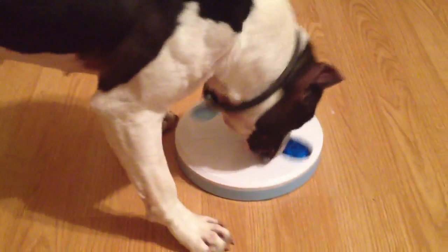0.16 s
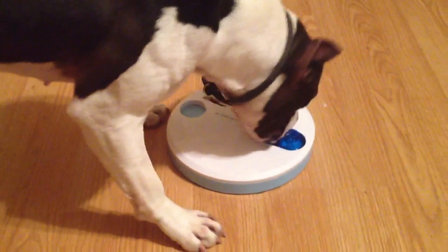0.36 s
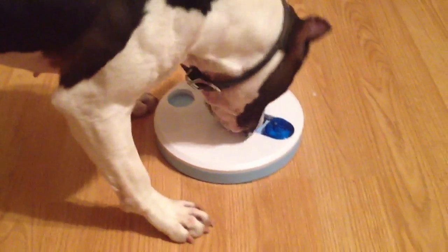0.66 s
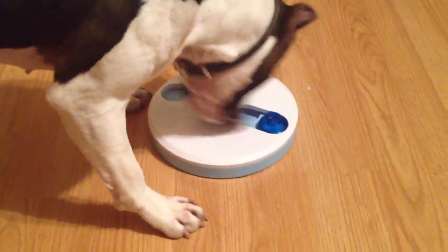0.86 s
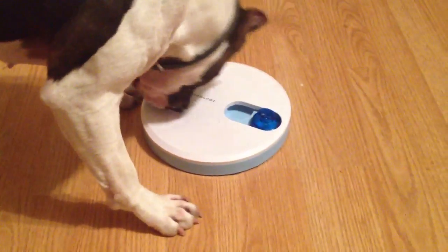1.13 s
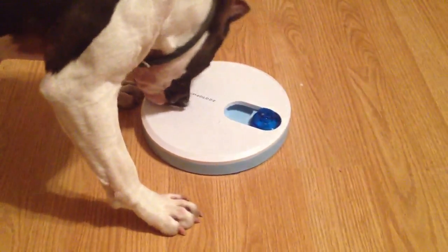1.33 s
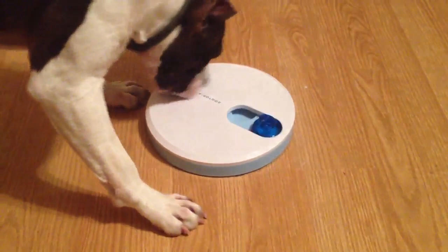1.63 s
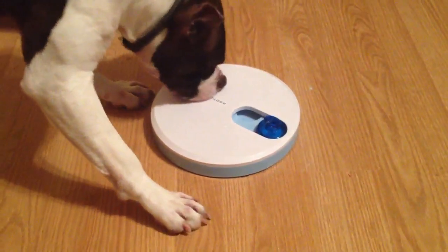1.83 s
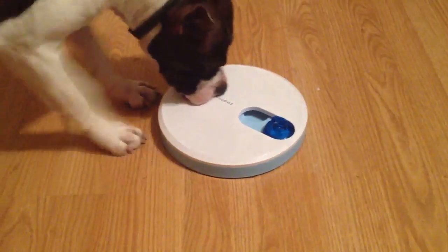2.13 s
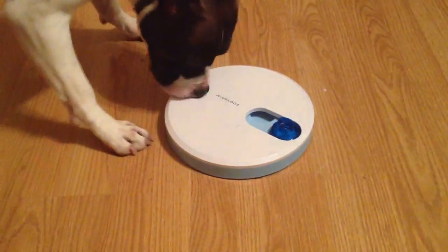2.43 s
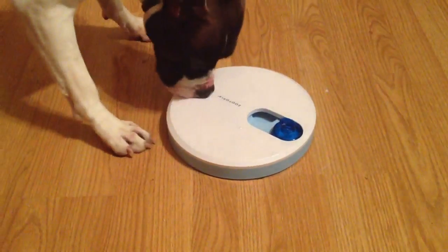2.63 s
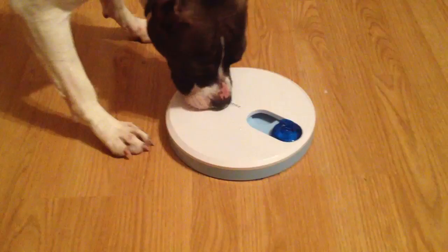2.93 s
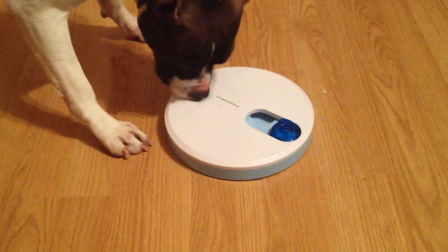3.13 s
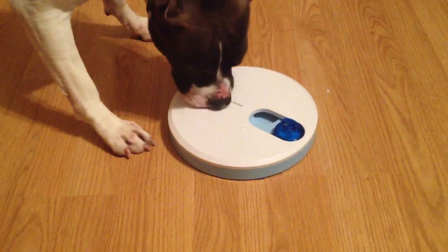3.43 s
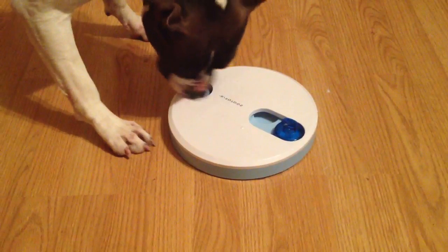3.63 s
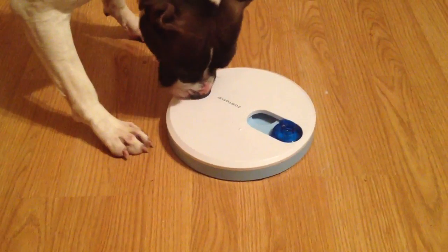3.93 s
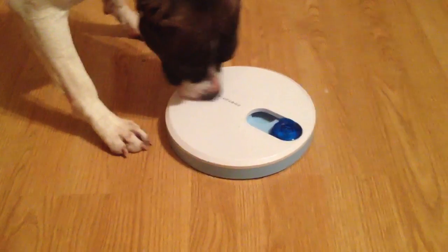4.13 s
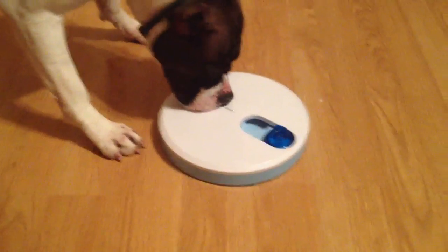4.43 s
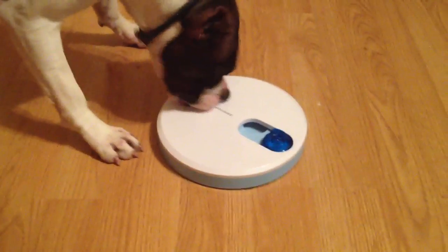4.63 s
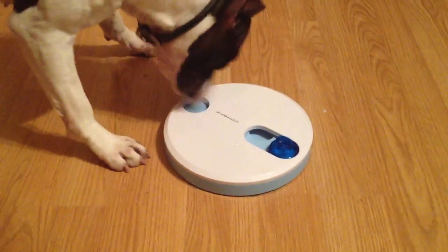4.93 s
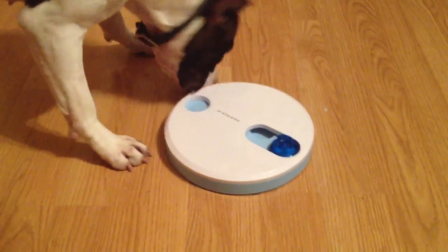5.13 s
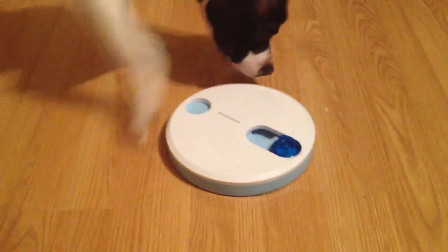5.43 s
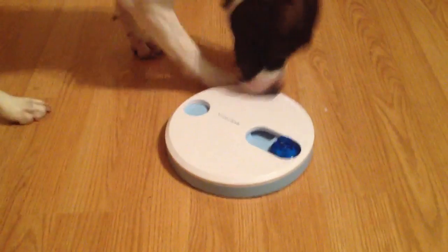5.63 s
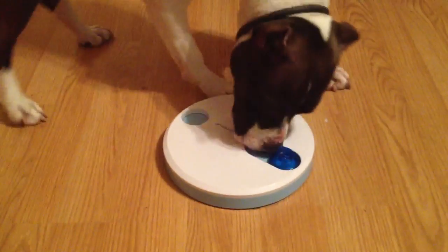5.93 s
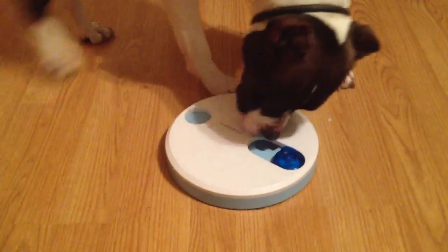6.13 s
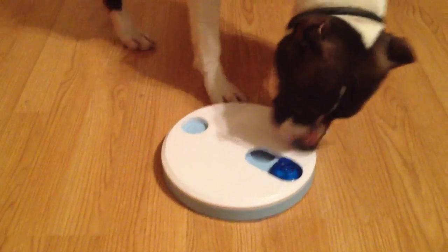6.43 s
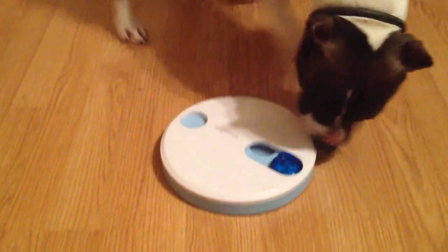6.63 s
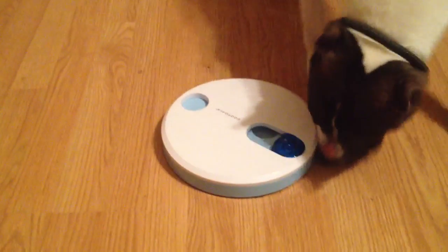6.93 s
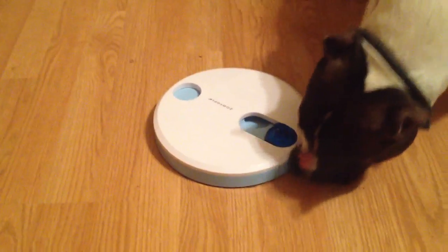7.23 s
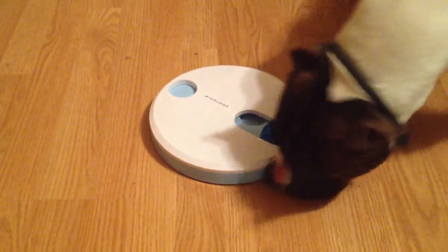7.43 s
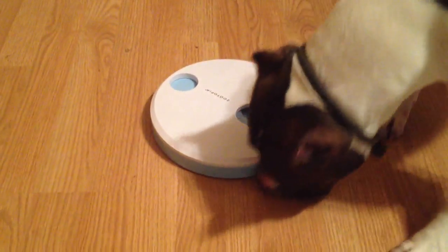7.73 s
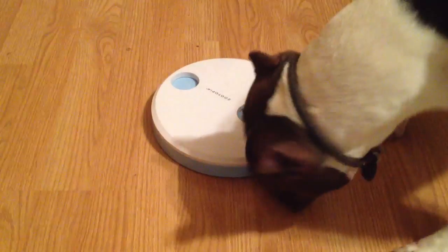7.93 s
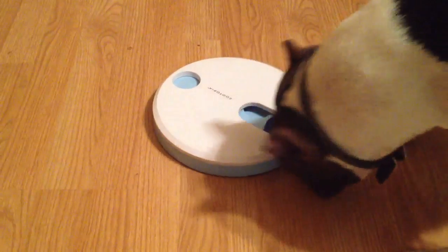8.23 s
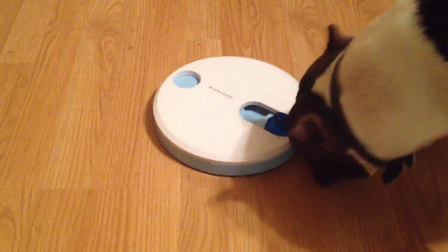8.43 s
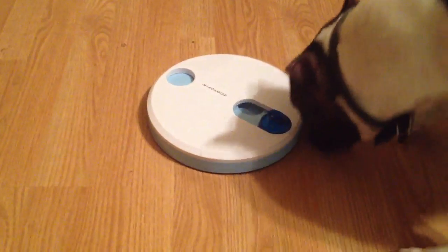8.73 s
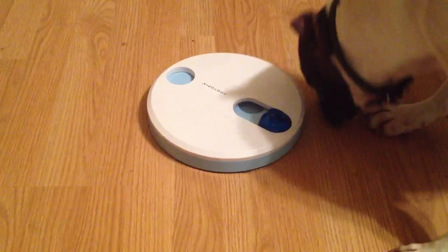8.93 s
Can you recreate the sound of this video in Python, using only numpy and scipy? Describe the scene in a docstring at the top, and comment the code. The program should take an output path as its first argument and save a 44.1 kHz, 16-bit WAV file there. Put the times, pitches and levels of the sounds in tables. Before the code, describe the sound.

A dog nudges a hollow plastic puzzle toy on a wooden floor in a small, live room. Soft bumps and lid rubbing run throughout, with sharp claw ticks just after two seconds, a short high whine near four, then a cluster of loud clacks. Later come claw clicks, soft paw thuds, breathy snuffles and a hard plastic judder near the end. One nearby microphone, faint air noise.

```python
"""A hollow plastic treat puzzle is worked by a dog on a wooden floor: bumps ring shell and lid as damped resonators,
and the turning lid rubs and judders as filtered random slips.
Claws tick (noise bursts and high modes), pads thud (swelling low cycles), nose and fur scuff (grainy hiss),
lips smack and the dog whines once (gliding harmonics). A small, bare room adds echoes and a tail;
one dry tick sounds on the microphone housing, over faint steady air noise."""
import sys
import numpy as np
from scipy import signal
from scipy.fft import rfft, irfft, next_fast_len
from scipy.io import wavfile

SR = 44100
rng = np.random.default_rng(int(sys.argv[2]) if len(sys.argv) > 2 else 0)


def inscribe(sig):
    """Save sig as 16-bit PCM at rate SR to the path in sys.argv[1].

    A 1-D sig is mono; a 2-D sig holds one channel per row.
    Samples are clipped to [-1, 1] before scaling.
    """
    pcm = np.round(np.clip(np.atleast_2d(sig).T, -1, 1) * 32767)
    wavfile.write(sys.argv[1], SR, pcm.astype(np.int16))


N = 399987
TIME = np.arange(N) / SR

# resonances of the hollow toy: centre_hz, width_hz, gain_db
SHELL = [(117, 34, -2), (174.5, 35, 2.5), (243, 62, 2.5), (300, 34, 1), (380, 11, -1), (477, 72, 1.5),
         (643, 114, -1), (750, 65, -0.5)]
# resonances of its lid: centre_hz, width_hz, gain_db
LID = [(844, 136, -1.5), (945, 32, 5), (1122, 220, 0), (1478, 160, 3), (1560, 314, 2), (2112, 450, 3),
       (2370, 514, 1.5)]
RASP = (520, 4.8, .3)  # coarse grain: slips per s, size spread dB, share of smooth hiss
SPOT_DETUNE = .035  # relative spread of resonances from spot to spot


def undb(db):
    """Decibels to gain."""
    return 10 ** (np.asarray(db) / 20)


def unit(x):
    """Scale to rms 1."""
    return x / np.sqrt(np.mean(x ** 2) + 1e-20)


def burst(x):
    """Scale each short sound to the energy of 10 ms at rms 1."""
    energy = np.sum(x ** 2, axis=-1, keepdims=True)
    return x * np.sqrt(.01 * SR / (energy + 1e-20))


def band(x, lo_hz, hi_hz, order=2):
    """Causal Butterworth band-pass."""
    edges_hz = [lo_hz, min(hi_hz, SR / 2 - 500)]
    return signal.sosfilt(signal.butter(order, edges_hz, "band", fs=SR, output="sos"), x + 1e-18)


def resonate(x, modes, detune=0):
    """Parallel resonances, neighbours in opposite phase, each randomly detuned."""
    tuning = 1 + detune * rng.standard_normal(len(modes))
    out = 0
    for k, (hz, width_hz, db) in enumerate(modes):
        b, a = signal.iirpeak(hz * tuning[k], hz / width_hz, SR)
        out = out + (-1) ** k * undb(db) * signal.lfilter(b, a, x + 1e-18)
    return out


def walk(rate_hz, size):
    """Random wander with a spread near 1: straight lines between random points."""
    position = np.arange(size) * rate_hz / SR
    count = int(position[-1]) + 2
    return np.interp(position, np.arange(count), rng.standard_normal(count))


def slips(rate_hz, spread_db, smooth, size):
    """Friction: tiny slips of uneven size and random sign over a smooth hiss."""
    occurs = rng.random(size) < rate_hz / SR
    sign = rng.choice([-1, 1], size)
    strength = undb(spread_db * np.minimum(rng.exponential(size=size), 3))
    return unit(unit(occurs * sign * strength) + smooth * rng.standard_normal(size))


def add(track, start_s, sound):
    """Mix a sound in at a time."""
    start = int(np.clip(start_s * SR, 0, N - 1))
    track[start:start + len(sound)] += sound[:N - start]


def bump(hz, clack_db, shell_db=-7, tick_db=-9, tick_s=0.007):
    """A soft push gives sinking low cycles and wakes the shell; the loose lid clacks and ticks on top."""
    cycles, clack_s = 1.2, 0.011  # low bumps ring longer
    t = np.arange(SR // 8) / SR
    fade = np.exp(-t * hz / cycles)
    rattle = slips(2200, 3, .75, len(t))
    pitch_hz = hz * (0.85 + 0.32 * np.exp(-t / 0.0049))
    thump = np.sin(2 * np.pi * np.cumsum(pitch_hz) / SR) * fade * (1 - np.exp(-t / 0.0011))
    shell = resonate(band(rattle * fade, 122, 1.9 * hz, order=3), SHELL)
    body = burst(burst(band(thump, 110, 710)) + undb(shell_db) * burst(shell))
    clack = burst(resonate(band(rattle * np.exp(-t / clack_s), 400, 2220), LID, SPOT_DETUNE))
    tick = burst(band(rattle * np.exp(-t / tick_s), 3900, 7300))
    return body + undb(clack_db) * (clack + undb(tick_db) * tick)


def knocks(clack_trim_db=-1):
    """Muzzle and paws bump the hollow toy; each bump is followed by a weaker one as it rocks back."""
    # bumps: start_s, body_level_db (over 10 ms), nominal_pitch_hz, clack_db (re body, before trim)
    bumps = [(0.2809, -46, 380, -10), (0.3182, -42, 494, -4.5), (0.8264, -55, 350, -11),
             (0.9457, -47.5, 230, -29), (1, -55, 273, -13), (1.1025, -46.5, 243, -35),
             (1.2264, -50.5, 232, -16), (1.2778, -52, 300, 2), (1.646, -45.5, 222, -26),
             (1.685, -52, 283, -10), (1.7322, -45.5, 260, -19), (1.8237, -39.5, 430, -9),
             (1.829, -41, 470, -9), (1.8364, -47, 423, -6), (2.0025, -47.5, 433, -6),
             (2.084, -46.5, 239, -16), (2.1419, -46.5, 438, 4), (2.2572, -48, 436, 0),
             (2.2792, -46.5, 260, -25), (2.385, -59, 300, -3), (2.605, -56.5, 436, -21),
             (2.635, -59, 480, -18), (2.7003, -46.5, 380, -33), (2.7701, -51.5, 460, -9.5),
             (2.841, -52.5, 247, -14), (2.94, -56, 300, 3), (3.036, -55, 227, -20), (3.1144, -51, 470, 3.5),
             (3.323, -47, 253, -28), (3.356, -44.5, 324, -25), (3.43, -51, 263, -13),
             (3.527, -49.5, 432, -20), (3.708, -50.5, 231, -28), (4.1263, -51, 400, -3),
             (4.176, -46.5, 234, -13), (4.285, -49, 362, -6.5), (4.3611, -44, 433, -4),
             (4.4056, -37, 392, -1), (4.4176, -40, 380, -3), (4.4335, -35.5, 660, -6),
             (4.464, -42, 440, -8), (4.478, -43, 462, -16), (4.6125, -46.5, 594, -26),
             (4.646, -51, 277, -15), (4.685, -53, 330, -17), (4.699, -53, 248, -20),
             (5.0258, -41, 255, -18), (5.042, -47, 278, -25), (5.074, -46, 370, -15.5),
             (5.86, -59, 300, -3), (5.937, -55, 380, 6), (6.06, -60, 428, -10), (6.41, -58, 270, -13),
             (6.775, -55.5, 353, 5.5), (6.936, -48, 400, -17), (7.052, -47.5, 432, -7),
             (8.411, -50, 356, -1), (8.665, -37.5, 247, -19), (8.7455, -40.5, 410, -5),
             (8.782, -45, 255, -10)]
    rebound_s, rebound_db, lag_scatter = .024, -13.5, .2
    out = np.zeros(N)
    for start_s, db, hz, clack_db in bumps:
        lag_s = rebound_s * np.exp(lag_scatter * rng.standard_normal())
        add(out, start_s, undb(db) * bump(hz, clack_db + clack_trim_db))
        add(out, start_s + lag_s, undb(db + rebound_db) * bump(hz, clack_db + clack_trim_db))
    return out


def rubbing(rumble_db=-65.0, scrape_db=-70, rustle_db=-68, grip_db=3.5, grip_hz=18):
    """The turning lid catches and slips: coarse slips shake the shell, fine ones scrape and crackle."""
    # how hard the muzzle works the lid: time_s, effort_db
    effort_points = [(0, -46.5), (.1, -72), (.55, -59.5), (.78, -62), (.9, -59), (1.06, -62.5), (1.35, -59),
                     (1.44, -70), (1.69, -55.5), (1.84, -53), (1.95, -55), (2.1, -52.5), (2.25, -48.5),
                     (2.4, -57), (2.53, -64), (2.8, -57.5), (3, -54), (3.18, -58.5), (3.42, -50.5),
                     (3.53, -59.5), (3.9, -63.5), (4.12, -53), (4.3, -56.5), (4.42, -53), (4.55, -52.5),
                     (4.72, -55.5), (5, -67.5), (5.15, -65), (5.41, -63.5), (5.56, -53), (5.73, -62.5),
                     (6.2, -66), (6.4, -61.5), (6.64, -59), (7.12, -60.5), (7.3, -54), (7.55, -57),
                     (7.85, -60.5), (8.06, -56.5), (8.51, -58.5), (8.74, -46.5), (8.89, -57), (9.07, -62)]
    usual_effort_db = -58.5  # the level arguments hold at this effort
    rustle_per_effort = 1.66  # crackle grows faster than rumble, dB per dB
    effort_db = np.interp(TIME, *np.transpose(effort_points)) - usual_effort_db + grip_db * walk(grip_hz, N)
    rumble = unit(resonate(band(slips(60, 3.8, 0.32, N), 110, 760), SHELL))
    scrape = unit(resonate(band(slips(260, 4.2, 0.75, N), 360, 2500), LID))
    rustle = unit(band(slips(500, 8.7, 1.0, N), 3280, 7600, order=3))
    out = undb(effort_db + rumble_db) * rumble
    out += undb(effort_db + scrape_db) * scrape
    return out + undb(rustle_per_effort * effort_db + rustle_db) * rustle


def skids(rise_s=0.0025, fall_s=0.0047, spread=1.87):
    """Plastic catches and lets go in a quick run of gritty slips that shake the lid."""
    # short judders of toy and lid: start_s, length_s, level_db, centre_hz
    judders = [(0.493, 0.02, -57.5, 1380), (.838, .04, -65, 800), (0.955, .02, -64, 1300),
               (1.571, 0.013, -49, 1580), (1.752, 0.024, -48, 1080), (2.04, 0.027, -51, 820),
               (4.776, 0.031, -63.5, 800), (4.885, 0.017, -59, 690), (8.051, 0.024, -59, 2300),
               (8.744, 0.012, -29, 1400), (8.777, .018, -43, 950), (8.817, .012, -49, 910)]
    out = np.zeros(N)
    for start_s, length_s, db, hz in judders:
        t = np.arange(int(length_s * SR) + SR // 20) / SR
        push = np.clip(t / rise_s, 0, 1) * np.exp(-np.maximum(t - length_s, 0) / fall_s)
        grit = band(slips(*RASP, len(t)), hz / spread, hz * spread)
        shaken = unit(grit) + .25 * unit(resonate(grit, LID, SPOT_DETUNE))
        add(out, start_s, undb(db) * push * unit(band(shaken, 430, 3350, order=4)))
    return out


def claws(ring_db=-7, spread=1.206, blur_s=0.0082):
    """A claw chatters for a few ms and rings short, high modes. Rows: towards the microphone, into the room."""
    # claws on boards and plastic: start_s, tick_level_db (over 10 ms), chatter_decay_s,
    # body_db, top_db (both re tick)
    strikes = [(.0024, -37, 0.0042, -20, -15), (0.0109, -36, 0.00097, -37, -12),
               (0.022, -48, .001, -20, -14), (0.0346, -44, .001, -15, -14), (.319, -53.5, .003, -13, -14),
               (0.706, -58.5, 0.0069, -3, -12), (0.9336, -52.5, 0.0046, -23, -8),
               (2.1052, -39, 0.0084, -15, -22), (2.1118, -33.5, 0.0043, -11, -26),
               (2.1382, -30.5, 0.0049, -11, -26), (2.2008, -44.5, .003, -10, -22),
               (2.354, -23.5, 0.0003, -21.5, -18.5), (2.3563, -35.5, 0.0034, -14, -25),
               (2.6893, -55, .005, -28, -9), (2.9287, -58, 0.0055, -5, -27), (3.216, -53, 0.017, -4, -19),
               (5.345, -58, 0.0027, -5, -22), (5.387, -51, 0.00087, -4, -11),
               (5.3948, -48, 0.00091, -7, -12), (5.5162, -41.5, 0.018, -3.5, -14),
               (5.524, -42.5, 0.007, -0.5, -18), (5.567, -41, 0.00099, -25, -14),
               (5.5854, -43, 0.0021, -5, -12), (5.5877, -34.5, 0.004, -8, -16),
               (5.5992, -34, 0.006, -4, -12), (5.61, -40.5, .006, -3.5, -14),
               (5.6528, -35.5, 0.001, -33, -16), (5.9358, -32, 0.004, -21, -9),
               (6.305, -51, 0.0021, -7, -22), (6.3601, -48.5, 0.0018, -14.5, -21),
               (6.4184, -47.5, 0.00071, -13, -19), (6.6873, -28, 0.006, -8.5, -15.5),
               (6.9352, -30.5, 0.0054, -10, -14), (6.941, -34, 0.0025, -13.5, -23),
               (6.953, -27, 0.003, -30, -27), (7.3752, -36, 0.0087, -6.5, -21),
               (7.392, -39, 0.0099, -15, -31), (7.438, -38.5, 0.013, -11, -30),
               (7.708, -27, 0.0008, -15, -8), (7.7111, -22, 0.00098, -28, -19),
               (7.7131, -30.5, 0.004, -13.5, -22), (7.7671, -37, 0.0037, -14, -32),
               (8.5855, -39, .002, -3, -24), (8.616, -36, .004, -1, -24), (8.64, -39, .0015, -12, -24)]
    # what a tick rings with: mode_hz, gain_db, t60_s
    tick_modes = [(2335, 9, 0.01), (3346, -2.5, 0.058), (3820, 6, 0.016), (4340, 2.5, 0.03),
                  (5200, -7, 0.016), (5500, -13, 0.037), (6380, -6, 0.015), (7260, 4, 0.011),
                  (8090, 6, 0.024)]
    tick_hz = 5600
    thud_db, thud_per_body = -23, 0.12  # the boards thud more when more body rings
    echo_s, echo_db = .017, -13  # a nearby wall throws each tick back, blurred
    out, t = np.zeros((2, N)), np.arange(SR // 16) / SR
    mode_hz, mode_db, mode_t60_s = np.transpose(tick_modes)[:, :, None]
    for start_s, db, decay_s, body_db, top_db in strikes:
        fades = np.exp(-t / np.array([[decay_s], [blur_s]]))
        chatter, blurred = rng.standard_normal((2, len(t))) * fades
        # over all directions the chatter's spectral peaks and dips even out to one clean blow
        contact = np.array([chatter, t == 0, blurred])
        # each spot struck detunes the modes differently
        tuning = 1 + 0.031 * rng.standard_normal((len(mode_hz), 1))
        partials = undb(mode_db - 60 * t / mode_t60_s) * np.cos(2 * np.pi * mode_hz * tuning * t)
        ring = np.sum(partials, 0)
        ringing = signal.fftconvolve(contact, ring[None])[:, :len(t)]
        tick = burst(contact) + undb(ring_db) * burst(ringing)
        tick = band(tick, tick_hz / spread, tick_hz * spread, order=1)
        tick = band(tick, 1990, 9160, order=5)
        body = resonate(band(contact, 1200, 3130), LID, SPOT_DETUNE)
        sound = burst(tick) + undb(body_db) * burst(body)
        sound += undb(thud_db + thud_per_body * body_db) * burst(band(contact, 322, 626))
        sound += undb(top_db) * burst(band(contact, 9700, 13800))
        direct, around, echo = undb(db) * sound
        add(out[0], start_s, direct)
        add(out[0], start_s + echo_s, undb(echo_db) * echo)
        add(out[1], start_s, around)
    return out


def pads(trim_db=-1):
    """A soft pad loads the boards: round low cycles swell and fade, rising as the weight comes on."""
    # paws set down: fullest_swing_s, thud_level_db (over 10 ms, before trim), pitch_hz, half_length_s
    steps = [(6.495, -56, 228, .004), (6.512, -52, 223, 0.0032), (6.528, -52, 271, .004),
             (7.497, -45, 251, .003), (7.513, -43, 261, 0.0028), (7.55, -48, 279, 0.0031),
             (7.569, -43, 201, 0.0033), (7.577, -33, 306.3, 0.0052), (7.629, -48.5, 300, 0.0058),
             (7.867, -51.5, 257, 0.0029), (7.892, -42, 255, 0.0038), (8.006, -47, 222, 0.0028),
             (8.023, -40.5, 238.5, 0.0043)]
    glide, brush_db = .22, -9
    room_db = -3  # the body above a paw muffles what it sends into the room
    out, t = np.zeros(N), np.arange(-SR // 20, SR // 20) / SR
    for peak_s, db, hz, half_s in steps:
        swell = np.exp(-(t / half_s) ** 2 / 2)
        pitch_hz = hz * (1 + glide * np.tanh(t / half_s))
        thud = swell * np.sin(2 * np.pi * np.cumsum(pitch_hz) / SR)
        brush = band(rng.standard_normal(len(t)), 113, 480, order=3) * np.exp(-np.abs(t) / (2 * half_s))
        add(out, peak_s + t[0], undb(db + trim_db) * (burst(thud) + undb(brush_db) * burst(brush)))
    return np.array([out, undb(room_db) * out])


def scuffs(rise_s=0.027, fall_s=0.019, flutter_db=2.0, trim_db=-2):
    """Nose, fur and pads give grainy swells of hiss; some whistle, the rasping ones carry a low flutter."""
    # snuffles and scuffs: start_s, length_s, hiss_level_db (before trim), centre_hz,
    # rasp_db, top_db, whistle_db (all three re hiss)
    swells = [(0, 0.036, -42.5, 4570, -11, -22, -3), (0.129, 0.097, -45, 6300, -9.5, -12, -20),
              (0.268, 0.053, -58.5, 5770, -11, -17, -13), (0.475, 0.036, -54.5, 5200, 1.5, -10, -14),
              (0.833, 0.029, -58.5, 6500, -10, -6, -20), (1.483, 0.065, -47.5, 5600, -9.5, -16, -21),
              (1.714, 0.04, -54, 5500, -1, -20, -3), (1.908, 0.051, -52.5, 5200, -13, -20, -17),
              (2.009, 0.022, -49, 5200, -0.5, -9, -15), (2.149, 0.046, -39, 4500, -14, -21, -18),
              (2.58, 0.081, -59, 5900, -21, -4, -15), (2.658, 0.069, -53, 6760, -30, -14, -8),
              (2.924, 0.068, -53, 5400, -2, -22, -7), (3.023, 0.073, -49.5, 5400, -18, -21, -10),
              (3.31, 0.17, -48.5, 5300, -9.5, -20, -6), (3.47, 0.12, -53, 5200, -8.5, -16, -15),
              (4.37, 0.16, -51, 4600, -14, -10, -20), (4.53, 0.14, -54.5, 4600, -9, -10.5, -20),
              (5.346, 0.06, -50, 4240, -1.5, -12, -10), (5.435, 0.071, -62, 5500, -4, 0, -20),
              (6.529, 0.14, -53, 4600, -9, -14.5, -19), (6.677, 0.058, -35.5, 5140, -21, -21, -20),
              (7.13, 0.047, -51, 3900, -6, -23, -13), (7.193, 0.038, -44.5, 4300, -7.5, -18, -15),
              (7.383, 0.089, -44, 4800, -21, -14, -13), (7.507, 0.06, -38, 5030, -11.5, -18, -13),
              (7.984, 0.042, -53, 5200, -15, -22, -12), (8.091, 0.087, -55, 5970, -21, -9, -13),
              (8.195, 0.054, -36, 5300, -8, -14, -19), (8.379, 0.04, -44, 5750, -5, -16, -1.5),
              (8.543, 0.059, -31, 5680, -7.5, -17, -7), (8.595, 0.078, -32, 5500, -5.5, -16, -7),
              (8.673, .13, -40.5, 5550, -1.5, -16, -8.5)]
    # resonances of the hiss: centre_hz, width_hz, gain_db
    hiss_modes = [(2510, 1100, -4.5), (4080, 1830, 0.5), (4600, 790, 2), (5600, 500, 0.5),
                  (6400, 1320, 0.5), (8070, 1900, 0.5)]
    low_re_rasp_db = -3
    whistle_width_hz = 430  # air through the nostrils sings in one narrow band
    out = np.zeros(N)
    for start_s, length_s, db, hz, rasp_db, top_db, whistle_db in swells:
        t = np.arange(int(length_s * SR) + SR // 10) / SR
        swell = np.clip(t / rise_s, 0, 1) * np.exp(-np.maximum(t - length_s, 0) / fall_s)
        swell *= undb(flutter_db * walk(88.0, len(t)))
        fine, coarse = slips(1400, 3.6, 1.0, len(t)), slips(*RASP, len(t))
        hiss = band(resonate(fine, hiss_modes, SPOT_DETUNE), hz / 1.394, hz * 1.237, order=1)
        hiss = band(hiss, 2300, 8800, order=4)
        rasp = resonate(band(coarse, 550, 3200), LID, SPOT_DETUNE)
        half_hz = whistle_width_hz / 2
        whistle = band(rng.standard_normal(len(t)), hz - half_hz, hz + half_hz)
        sound = unit(hiss) + undb(rasp_db) * unit(rasp) + undb(whistle_db) * unit(whistle)
        sound += undb(low_re_rasp_db + rasp_db) * unit(band(coarse, 317, 720))
        sound += undb(top_db) * unit(band(fine, 11000, 13600))
        add(out, start_s, undb(db + trim_db) * swell * sound)
    return out


def smacks(width=.4):
    """Wet lips part and the mouth cavity rings briefly."""
    # lips and tongue: start_s, level_db (over 10 ms), mouth_resonance_hz, noise_decay_s
    partings = [(.838, -63, 1820, .005), (0.893, -55.5, 1740, 0.004), (.904, -62, 1770, .004),
                (.91, -65, 1850, .003), (1.484, -60, 1770, .005), (3.3424, -41.5, 1630, 0.0033),
                (3.439, -50, 1135, .012), (6.547, -58.5, 2100, 0.0035)]
    out, t = np.zeros(N), np.arange(SR // 16) / SR
    for start_s, db, hz, decay_s in partings:
        cavity = np.sin(2 * np.pi * hz * t) * np.exp(-t / 0.0069)
        # the noise decay also shortens the cavity ring
        parting = (cavity + rng.standard_normal(len(t))) * np.exp(-t / decay_s)
        add(out, start_s, undb(db) * burst(band(parting, hz / (1 + width / 2), hz * (1 + width / 2))))
    return out


def whine(rough=.007, flicker_db=2.5, shake_db=3, hiss_db=-66):
    """One high, unsteady glide; overtones brighten and fade as they slide through the nose's resonances."""
    # the whine's course: time_s, pitch_hz, fundamental_db (peak), overtones_db
    glide = [(3.57, 1380, -74, -14), (3.605, 1372, -64, -14), (3.645, 1335, -51, -14),
             (3.668, 1196, -58.5, -10), (3.7, 1065, -63, -11), (3.725, 1058, -57, -7),
             (3.757, 1080, -55, -11), (3.78, 1093, -67, 0), (3.812, 1150, -58.5, -8),
             (3.845, 1225, -59.5, -4), (3.89, 1270, -59.5, -5.5), (3.915, 1242, -58, -7),
             (3.942, 1187, -57.5, -4), (3.98, 1183, -58, -9), (4.025, 1252, -61, -13),
             (4.07, 1250, -76, -12)]
    # how the nose colours the overtones: freq_hz, gain_db
    nose_colour = [(2100, -1), (2280, -1), (2370, -7), (2500, -3), (3200, -7), (3700, 0), (4300, 0),
                   (4700, -6), (5000, -2), (5400, 0), (5900, 4), (6300, -1), (6800, -8)]
    s, *columns = np.transpose(glide)
    hz, db, bright_db = (np.interp(TIME, s, column) for column in columns)
    wobble = 1 + rough * walk(600, N) + rough / 3 * walk(70, N)
    phase = 2 * np.pi * np.cumsum(hz * wobble) / SR
    voice = np.sin(phase)
    for k in range(2, 6):
        colour_db = np.interp(k * hz, *np.transpose(nose_colour))
        voice += undb(colour_db + bright_db + flicker_db * walk(45, N)) * np.sin(k * phase)
    tone = undb(db + shake_db * walk(120, N)) * voice
    hiss = undb(hiss_db) * unit(band(rng.standard_normal(N), 4700, 6800))
    gate = np.clip(np.minimum(TIME - s[0], s[-1] - TIME) / 0.017, 0, 1)
    return gate * (tone + hiss)


def shade(x, start_s=7, shade_db=-8.5, from_hz=7200, full_hz=8600):
    """The dog steps between the toy and the microphone; its head and body dull the treble from then on."""
    size = next_fast_len(N)
    depth = np.clip((np.fft.rfftfreq(size, 1 / SR) - from_hz) / (full_hz - from_hz), 0, 1)
    dull = irfft(rfft(x, size) * undb(shade_db * depth), size)[:, :N]
    hidden = np.clip((TIME - start_s) / .2, 0, 1)
    return x + hidden * (dull - x)


def reverb_tail():
    """The room's dense answer for one position of the dog: noise bands, each with its own decay."""
    # reverberation: centre_hz, t60_s, tail_db (spectral energy re a unit impulse)
    decay_bands = [(151, 0.44, -8), (400, 0.25, -2.5), (1220, 0.45, -4), (3250, 0.46, 0),
                   (6900, 0.42, -6.5), (13300, 0.26, -3.5)]
    t = np.arange(SR // 2) / SR
    hz, t60_s, db = np.transpose(decay_bands)
    log_hz = np.log(np.fft.rfftfreq(len(t), 1 / SR) + 1)
    noise, tail = rfft(rng.standard_normal(len(t))), np.zeros(len(t))
    for share, seconds, tail_db in zip(np.eye(len(hz)), t60_s, db):
        fade = undb(-60 * t / seconds) * np.clip((t - .003) / 0.0079, 0, 1)
        banded = irfft(noise * np.interp(log_hz, np.log(hz), share), len(t))
        tail += undb(tail_db) * banded * fade / np.linalg.norm(fade)
    return tail


def room(direct, spread, count=5):
    """Direct sound with near echoes, and a tail whose fine colour changes as the dog moves about."""
    # floor and furniture: delay_s, gain_db
    near_echoes = [(.0029, -25), (.0062, -24.5), (0.017, -19.5)]
    near = np.zeros(SR // 10)
    near[0] = 1
    for delay_s, echo_db in near_echoes:
        near[int(delay_s * SR)] += undb(echo_db)
    out = signal.fftconvolve(direct, near)[:N]
    for place in np.eye(count):
        # equal-power crossfade from place to place
        share = np.sqrt(np.interp(TIME, np.linspace(0, TIME[-1], count), place))
        out = out + signal.oaconvolve(spread * share, reverb_tail())[:N]
    return out


def handling_tick(start_s=4.092, db=-42, decay_s=0.00029):
    """One dry tick on the microphone's own housing, too close to stir the room."""
    out, t = np.zeros(N), np.arange(SR // 40) / SR
    add(out, start_s, undb(db) * burst(band(-np.exp(-t / decay_s), 390, 2900, order=3)))
    return out


def air(level_db=-62.5):
    """Faint steady room noise and microphone hiss: spectrally shaped white noise."""
    # still room air: freq_hz, relative_density_db
    spectrum = [(26, -55), (45, -16), (87, -14.5), (134, -4), (229, -4), (292, -0.5), (364, -5.5),
                (511, -8.5), (773, -17), (1140, -15.5), (1490, -18), (5270, -21), (8580, -22),
                (9680, -29.5), (15000, -23.5)]
    hz, db = np.transpose(spectrum)
    log_hz = np.log(np.fft.rfftfreq(N, 1 / SR) + 1)
    colour = undb(np.interp(log_hz, np.log(hz), db))
    return undb(level_db) * unit(irfft(rfft(rng.standard_normal(N)) * colour, N))


def scene():
    """Dog and toy in the room, heard by one microphone on both channels."""
    toy = knocks() + rubbing() + skids()
    dog = claws() + pads() + scuffs() + smacks() + whine()
    direct, spread = shade(toy + dog)
    mono = room(direct, spread) + handling_tick() + air()
    return np.array([mono, mono])


def record(dry):
    """The recorder thins the deep bass and cuts the top."""
    top_hz = 15500
    thin = signal.sosfilt(signal.butter(2, 75, "high", fs=SR, output="sos"), dry)
    return signal.sosfilt(signal.ellip(8, .2, 70, top_hz, fs=SR, output="sos"), thin)


dry = scene()
out = record(dry)
inscribe(out)
```